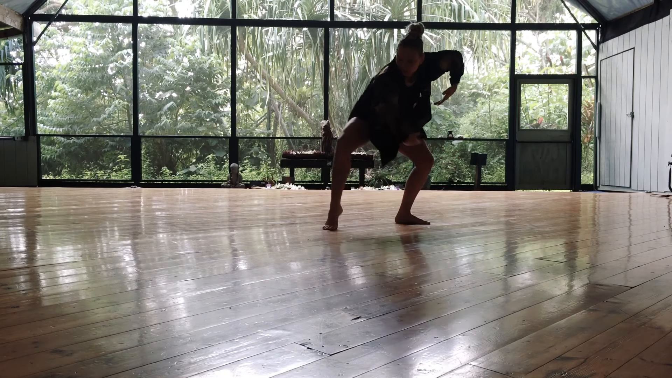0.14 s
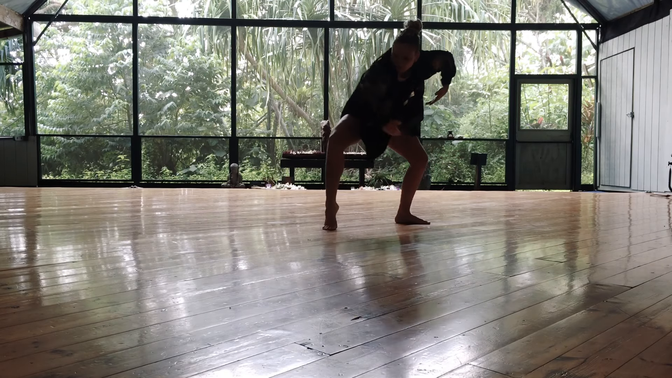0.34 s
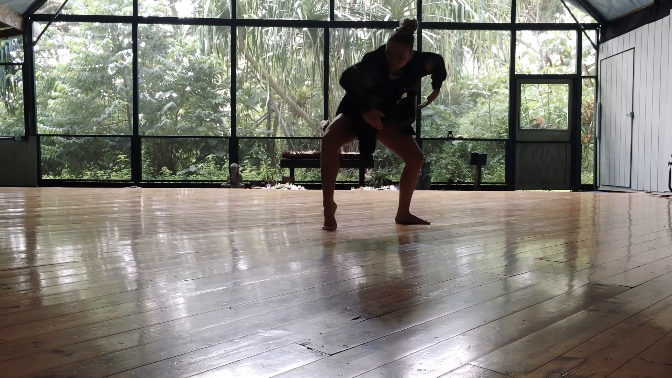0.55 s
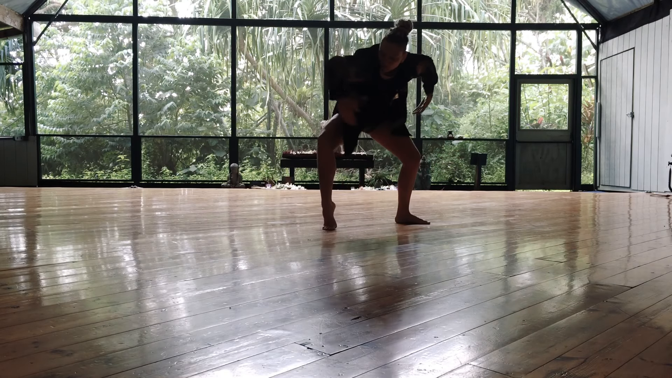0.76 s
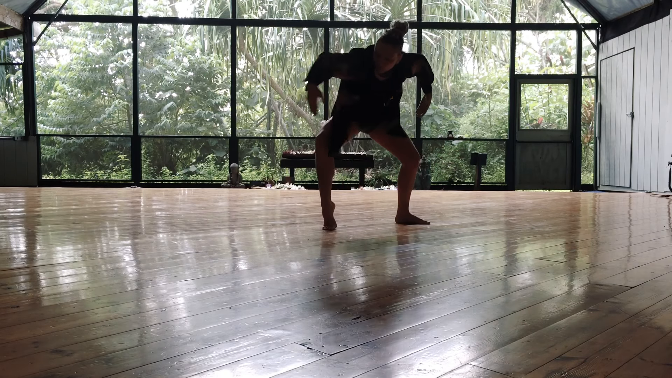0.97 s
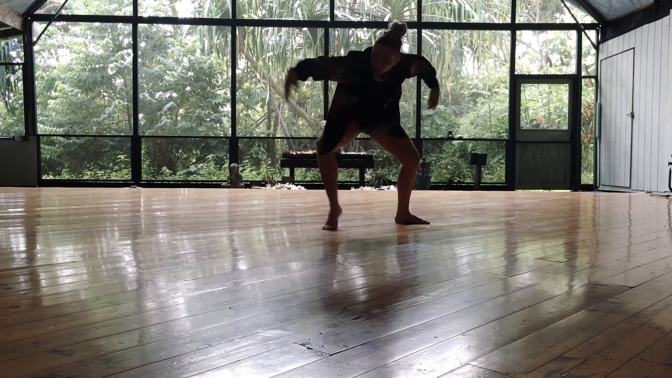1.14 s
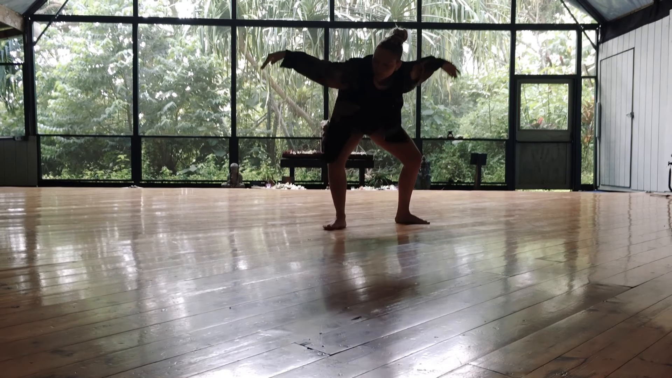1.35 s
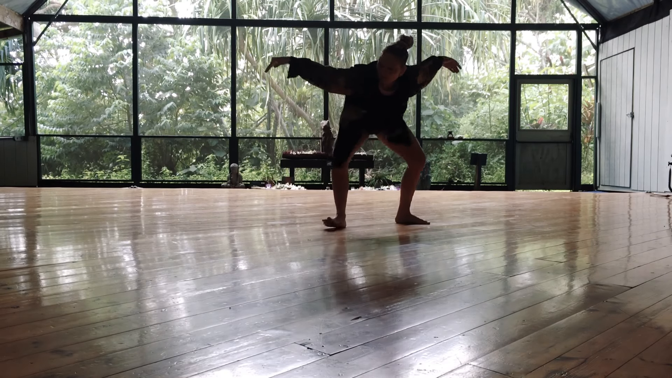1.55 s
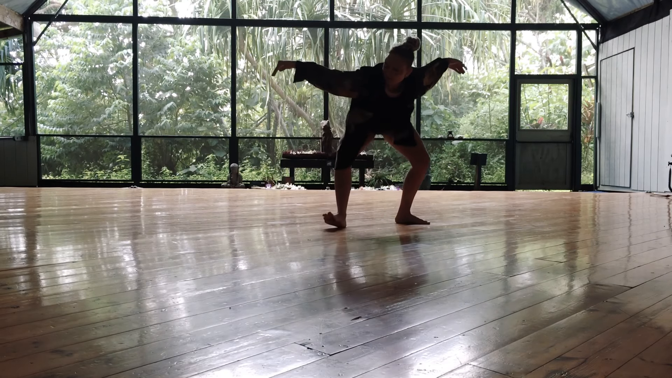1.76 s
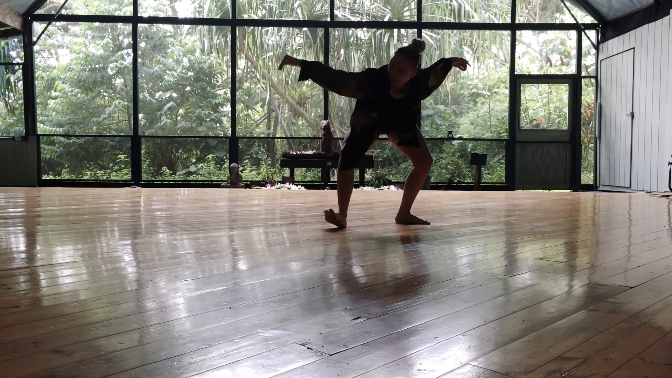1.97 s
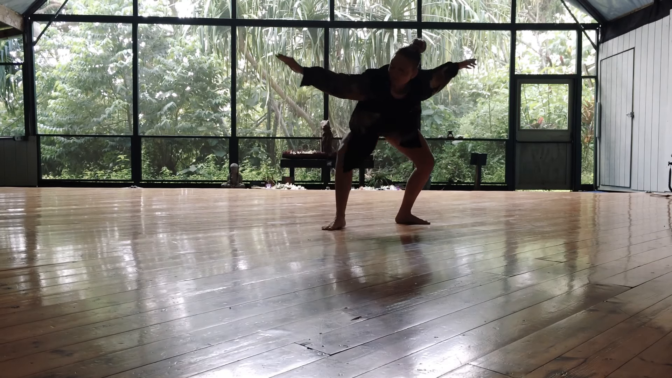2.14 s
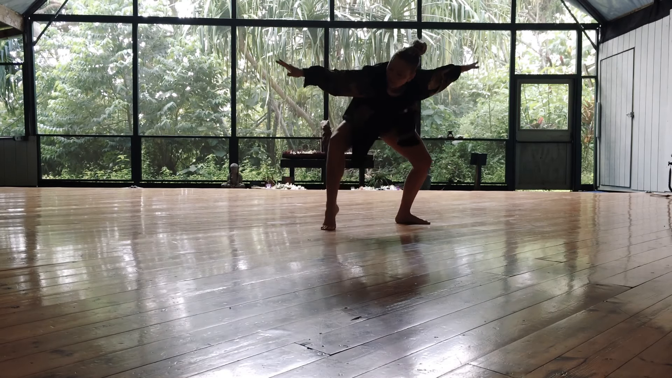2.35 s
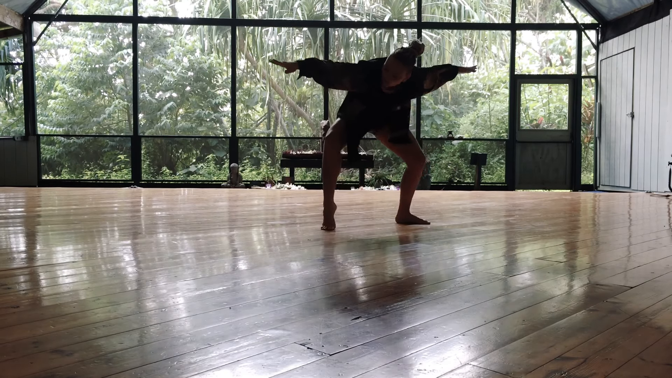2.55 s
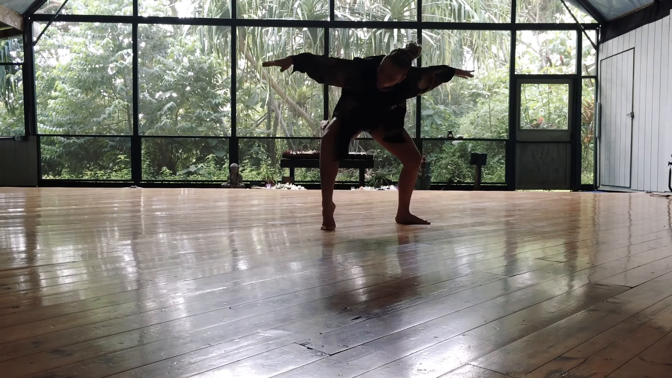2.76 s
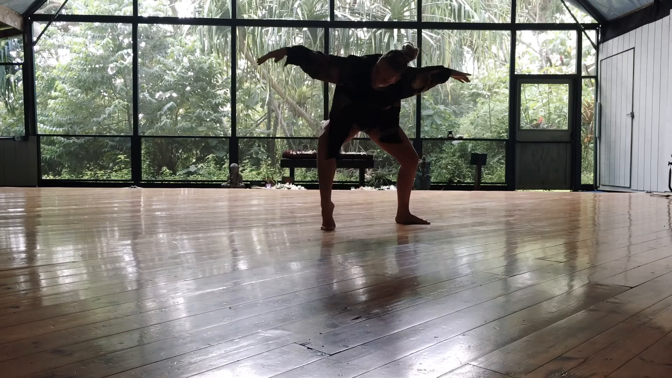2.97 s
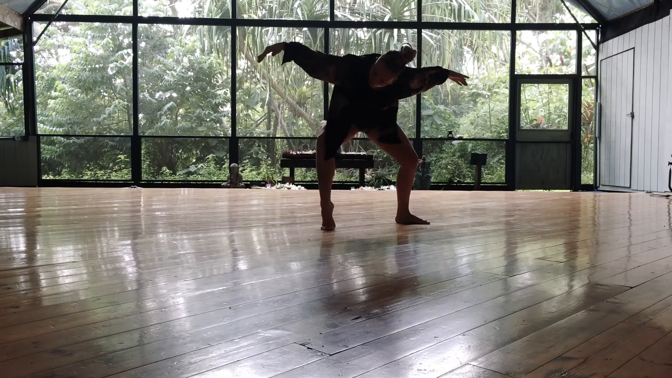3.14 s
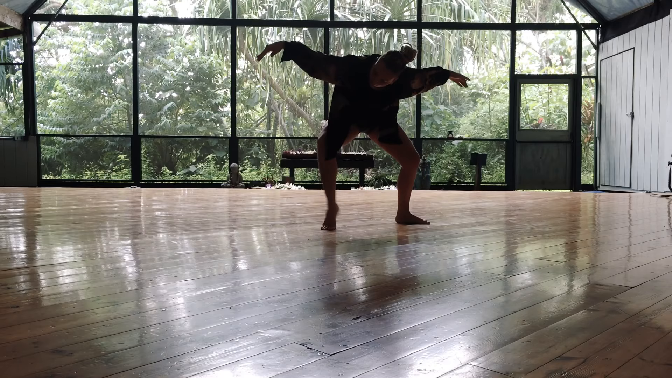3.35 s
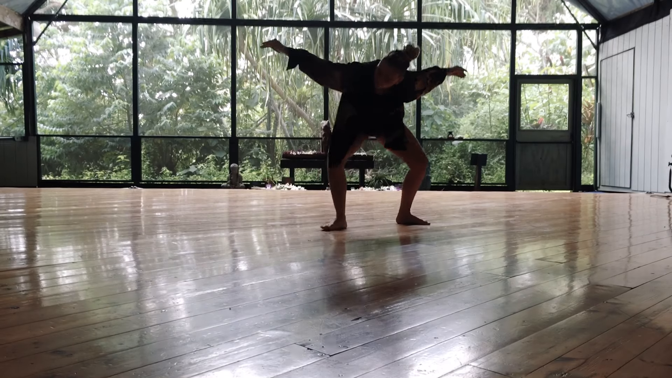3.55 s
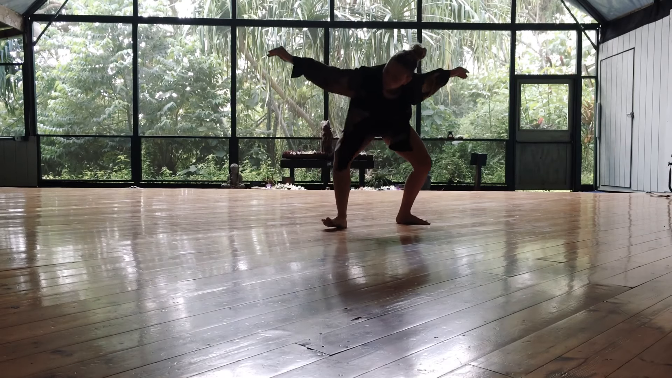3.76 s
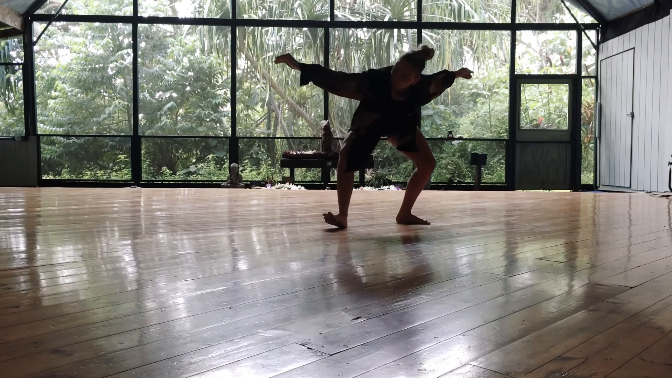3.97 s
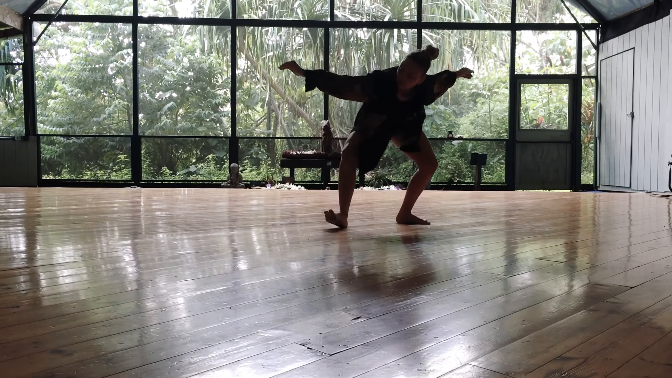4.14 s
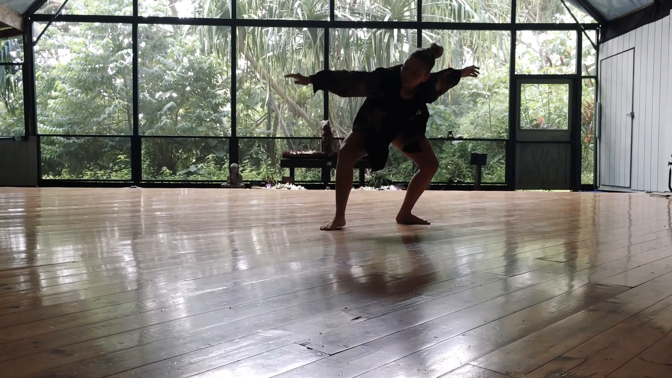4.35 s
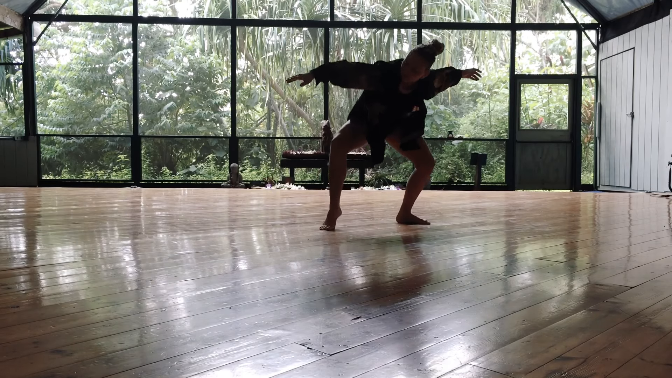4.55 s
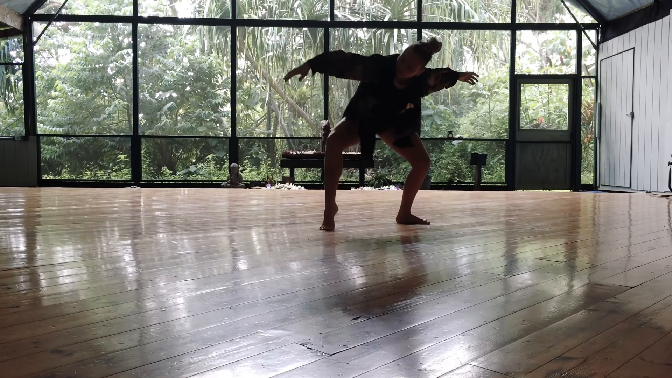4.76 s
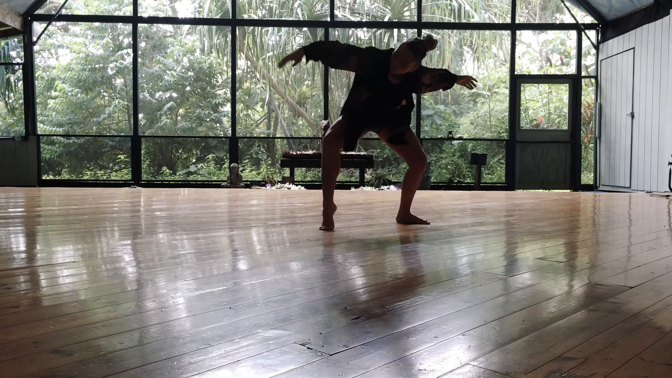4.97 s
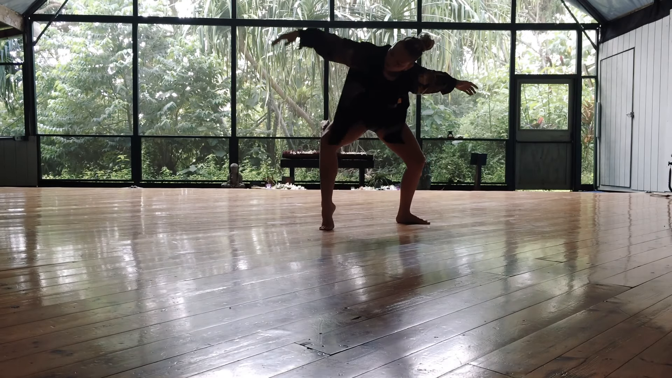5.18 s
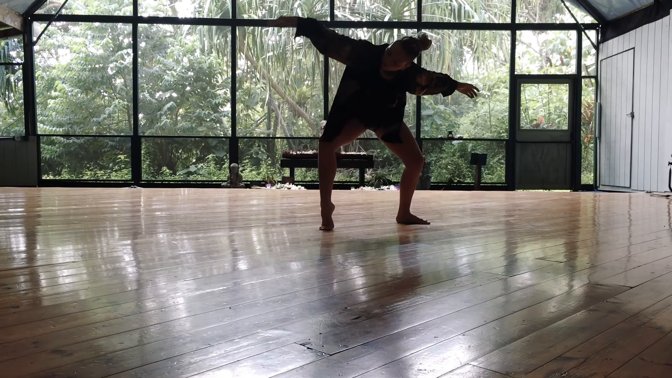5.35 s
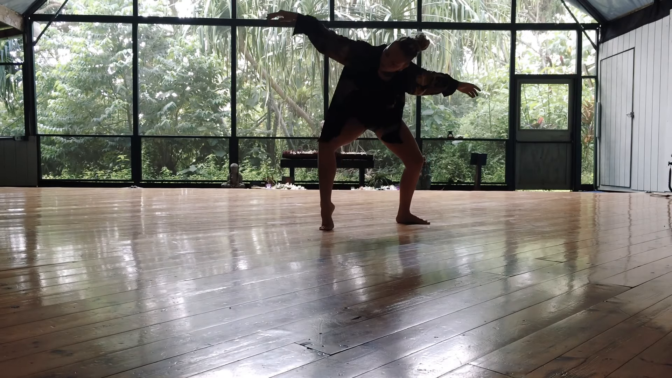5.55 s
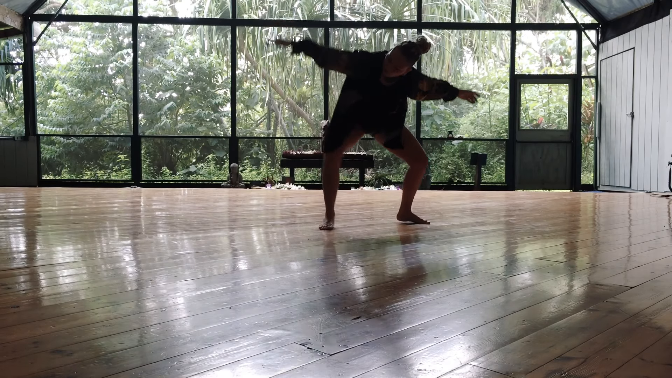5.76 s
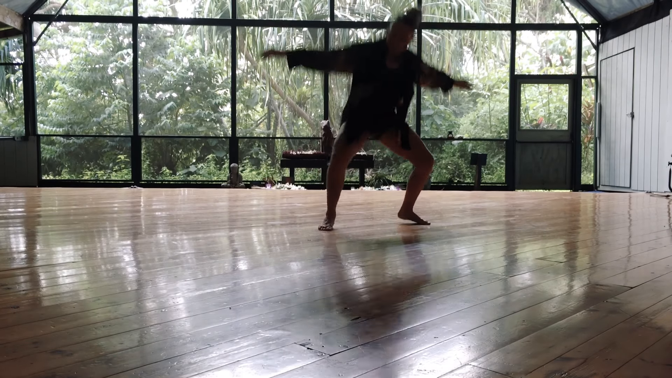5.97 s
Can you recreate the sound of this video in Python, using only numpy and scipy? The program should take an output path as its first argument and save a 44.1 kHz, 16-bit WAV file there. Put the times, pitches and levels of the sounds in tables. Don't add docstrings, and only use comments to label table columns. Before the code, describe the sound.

A quiet, large wooden-floored pavilion with faint low rumble and slight microphone hiss. Almost at once, at 0.04 s, the ball of a bare foot slaps the varnish with a bright crack, its echoes scattering off roof and walls. Thin, rapid insect trills near 6 kHz emerge very faintly, pausing and returning. After a barely audible toe touch at 1.1 s, a heel stamps firmly at 1.3 s, a deep thud with small rebounds as the boards ring briefly. A duller slap follows at 2.2 s, with a faint toe at 2.45 s. At 3.5 s comes the hardest stamp, a heavy boom with skin smack, quick rebound and a tail fading within about a second. A lighter, higher slap clicks at 4.4 s. A faint toe at 5.1 s, brief skin brushes around 5.85 s, then a softer stamp at 5.9 s, its echo cut short by the ending near 6 s.

```python
import sys
import numpy as np
from scipy import signal
from scipy.fft import rfft, irfft
from scipy.io import wavfile
from scipy.ndimage import uniform_filter1d

SR = 44100
rng = np.random.default_rng(int(sys.argv[2]) if len(sys.argv) > 2 else 0)


def master(y):
    cut = np.clip(np.atleast_2d(y).T, -1, 1)
    pcm = np.round(cut * 32767)
    wavfile.write(sys.argv[1], SR, pcm.astype(np.int16))


def elevation(decibels):
    levels = np.asarray(decibels, float)
    return 10 ** (levels / 20)


N = 265041


def at_hz(points, hz, column=1):
    table = np.array(points)
    return np.interp(np.log(hz), np.log(table[:, 0]), table[:, column])


def rms_one(x):
    return x / np.sqrt(np.mean(x ** 2) + 1e-20)


def drift(rate_hz):
    r = np.exp(-80 * np.pi * rate_hz / SR)
    noise = rng.standard_normal(N // 40 + 2002)
    slow = signal.lfilter([1], [1, -2 * r, r * r], noise)[2000:]
    return np.interp(np.arange(N) / 40, np.arange(len(slow)), rms_one(slow))


def resonate(x, hz, width_hz):
    r = np.exp(-np.pi * width_hz / SR)
    feedback = [1, -2 * r * np.cos(2 * np.pi * hz / SR), r * r]
    return signal.lfilter([(1 - r * r) / 2, 0, (r * r - 1) / 2], feedback, x)


def bands(size):
    edges = 22 * 2 ** np.arange(0, 9.6, .5)
    white = rng.standard_normal((2, size + 8000))
    for k, (low, high) in enumerate(zip(edges, edges[1:])):
        band_pass = signal.butter(2, [low, high], "band", fs=SR, output="sos")
        yield np.sqrt(low * high), signal.sosfilt(band_pass, white[k % 2])[8000:]


def add(out, piece, s):
    first = round(s * SR) - len(piece) // 2
    out[max(first, 0):first + len(piece)] += piece[max(-first, 0):len(out) - first]


def bell(ms, size=4096):
    u = (np.arange(size) - size // 2) / (SR * max(ms, .03) / 1000)
    return u, np.exp(-u ** 2 / 2)


def bursts(widths_ms):
    shape = []
    for ms in widths_ms:
        u = np.sign(ms) * bell(abs(ms))[0]
        steep = bell(min(abs(ms) / 5, .8))[1]
        shape.append(np.where(u < 0, steep, np.exp(-np.abs(u))))
    shape = np.array(shape)
    burst = rng.standard_normal(shape.shape) * shape
    for _ in range(6):
        spectrum = rfft(burst, axis=1)
        burst = irfft(spectrum / (np.abs(spectrum) + 1e-12), axis=1)
        level = np.sqrt(np.abs(uniform_filter1d(burst ** 2, size=15, axis=1)) + 1e-16)
        burst = burst / level * shape
    burst = burst * np.sign(np.sum(burst ** 3, axis=1, keepdims=True))
    return burst / np.sqrt(np.sum(burst ** 2, axis=1, keepdims=True))


# pitch_hz, level_db (per Hz)
RUMBLE_SPECTRUM = [(22, -25), (53, -0.5), (107, 2.5), (204, -5.5), (305, -14.5), (1420, -25.5),
                   (5200, -59.5), (11400, -110)]
# pitch_hz, level_db (per Hz)
HISS_SPECTRUM = [(300, -0.5), (5000, 9.5), (9000, 3.5), (15000, 0.5)]
# time_s, level_db
RUMBLE_FADER = [(0, -46.5), (1, -51), (5, -51), (6.01, -49)]


def background():
    rumble, hiss, together = 0, 0, drift(1.0)
    for hz, band in bands(N):
        patches_db = 1.4 * (.5 * together + drift(9.3))
        rumble = rumble + band * elevation(at_hz(RUMBLE_SPECTRUM, hz) + patches_db)
        hiss = hiss + band * elevation(at_hz(HISS_SPECTRUM, hz))
    time_s, level_db = np.transpose(RUMBLE_FADER)
    fader_db = np.interp(np.arange(N) / SR, time_s, level_db)
    return elevation(fader_db) * rms_one(rumble) + elevation(-74.5) * rms_one(hiss)


# start_s, tick_db, trapped_air_hz, crack_db, dent_db
TAPS = [
    (0.0381, -23.5, 2410, 6, -29),
    (2.2026, -22, 2100, -7.5, -28.5),
    (4.3754, -25, 3700, 0, -27.5),
]
# delay_ms, level_db, spread_ms, pitch_share, trapped_air_db
TAP_SKIN = [(0, 0, .05, 1.0, -1), (2.9, -12, .2, .53, 2)]
# start_s, dent_db, contact_ms, skin_lead_ms, skin_db
STAMPS = [
    (1.3041, -13.5, 2.3, 8, -34),
    (3.5212, -3.6, 1.8, 6.2, -27),
    (5.8957, -16, 2.5, 8.5, -32.5),
]
# time_share, level_db, spread_ms (minus: swells in), trapped_air_hz, crack_db
STAMP_SKIN = [(0, 6, -0.4, 1370, -10), (.7, -1.5, -4.5, 1540, -21.5), (1.002, 0.5, 6, 1410, -33),
              (1.098, -9, 19.5, 2240, -15), (4, -17, 26, 2000, -4)]
# start_s, level_db, spread_ms, trapped_air_hz, crack_db
TOUCHES = [
    (1.0985, -66, 2, 1190, -10),
    (2.4576, -60, 2.5, 1600, -17),
    (5.081, -64, 5, 1210, -16),
    (3.5268, -23, 3, 1300, -40),
    (5.8325, -39, 1.8, 1080, -30),
    (5.855, -49, 4, 2500, -12),
    (5.836, -47, 7, 1500, -16),
]


def contacts():
    rows = []
    for s, db, hz, crack_db, _ in TAPS:
        rows.append((s, -38.5, -1.27, 2000, 2.5, -3.5))
        for k, (lag_ms, part_db, ms, share, air_db) in enumerate(TAP_SKIN):
            after_crack_db = crack_db - 3 * k
            rows.append((s + lag_ms / 1000, db + part_db, ms, share * hz, air_db, after_crack_db))
    for s, _, _, lead_ms, db in STAMPS:
        for share, part_db, ms, hz, crack_db in STAMP_SKIN:
            rows.append((s - (1 - share) * lead_ms / 1000, db + part_db, ms, hz, -29, crack_db))
    for s, db, ms, hz, crack_db in TOUCHES:
        rows.append((s, db, ms, hz, -5, crack_db))
    return rows


def slaps():
    spots = 3
    out = np.zeros((spots, N))
    dull = signal.butter(1, [220, 900], "band", fs=SR, output="sos")
    airy = signal.butter(1, [1900, 10000], "band", fs=SR, output="sos")
    soft = signal.butter(1, 2500, fs=SR, output="sos")
    skin = contacts()
    for k, burst in enumerate(bursts(np.array(skin)[:, 2])):
        s, db, ms, air_hz, air_db, crack_db = skin[k]
        body = rms_one(signal.sosfilt(soft, signal.sosfilt(dull, burst)))
        ring = resonate(resonate(burst, air_hz, .2 * air_hz), air_hz, .5 * air_hz)
        trapped_air = rms_one(signal.sosfilt(soft, ring))
        crack = rms_one(signal.sosfilt(airy, burst))
        height = elevation(db) * np.sqrt(abs(ms) * SR / 1000 / len(burst))
        slap = height * (body - elevation(air_db) * trapped_air + elevation(crack_db) * crack)
        add(out[k % spots], slap, s)
    return out


# start_s, dent_db, contact_ms
REBOUNDS = [
    (1.318, -20, 2.6),
    (1.3345, -19.5, 3.4),
    (3.5322, -15, 1.6),
    (5.9256, -27, 1.8),
]


def dents():
    rows = [(s + 1.4 / 1000, db, 1.6, -5.5) for s, _, _, _, db in TAPS]
    for s, db, ms, _, _ in STAMPS:
        rows.append((s, db, ms, -11.5))
        rows.append((s - .4 * ms / 1000, db - 6, .42 * ms, -13.5))
    return rows + [(s, db, ms, -16) for s, db, ms in REBOUNDS]


# pitch_hz, level_db, t60_s
BOARD_MODES = [(40, 9, 0.65), (65, 18, 0.15), (106, -7, 0.12), (152, -20, 0.14), (199.6, 18.5, 0.062),
               (230, -46, 0.11), (363, -34, 0.11), (492, -28, .2)]


def thuds():
    dent, ringing = np.zeros(N), np.zeros(N)
    pushes = dents()
    strengths_db = rng.normal(0, 2, (len(pushes), len(BOARD_MODES)))
    for s, db, ms, _ in pushes:
        u, shape = bell(ms)
        add(dent, elevation(db) * (1 - u ** 2) * shape, s)
    for k, (hz, level_db, t60_s) in enumerate(BOARD_MODES):
        push = np.full(N, 1e-18)
        for (s, db, ms, ring_db), own_db in zip(pushes, strengths_db[:, k]):
            shape = bell(0.4 * ms)[1]
            add(push, elevation(db + ring_db + level_db + own_db - 20) * shape / shape.sum(), s)
        r = elevation(-60 / (t60_s * SR))
        w = 2 * np.pi * hz / SR
        mode = signal.lfilter([0, np.sin(w)], [1, -2 * r * np.cos(w), r * r], push)
        ringing += (-1) ** k * mode
    return dent + ringing


ECHO_DELAYS = [21.24, 24.51, 31.43, 52.2, 54.8]
# level_db, smear_ms
ECHO_HIGHS = [(-2, 2.46), (-6, 1.4), (-17, 4.9), (-6, 2.0), (-8, 2.9)]


def echoes():
    first = [(ms, db, smear_ms) for ms, (db, smear_ms) in zip(ECHO_DELAYS, ECHO_HIGHS)]
    ms, _, smear_ms = first[3]
    flutter = [(ms + 34.3 * (k + 1), -12 - 5 * k, smear_ms + 1.34 * k) for k in range(6)]
    return first + flutter


# delay_ms, share
MIRRORS = [(21, .35), (25.5, -.2), (30, .15), (53, -.12), (57.5, .13), (87, .06)]
# pitch_hz, level_db, t60_s
HALL_TAIL = [(60.5, -43, 0.1), (150, -80, 0.093), (330, -34, 0.36), (810, -31.5, 0.67), (2100, -33, 1),
             (4600, -36, 1), (7600, -38, 1), (14100, -41, 0.69)]


def pavilion(x):
    size = SR
    t = np.arange(size) / SR
    mirror, scattered = np.zeros(size), np.zeros((len(x), size))
    for ms, share in MIRRORS:
        mirror[round(ms * SR / 1000)] = share
    for ms, db, smear_ms in echoes():
        for path, burst in zip(scattered, bursts([smear_ms] * len(x))):
            add(path, elevation(db) * burst, ms / 1000)
    mirror = signal.sosfilt(signal.butter(2, 450, fs=SR, output="sos"), mirror)
    beams = signal.butter(1, [520, 7000], "band", fs=SR, output="sos")
    scattered = signal.sosfilt(beams, scattered)
    tail = 0
    for hz, band in bands(size * len(x)):
        dying_db = -60 * t / max(at_hz(HALL_TAIL, hz, column=2), .05)
        tail = tail + band.reshape(len(x), size) * elevation(at_hz(HALL_TAIL, hz) + dying_db)
    tail = tail * np.interp(t, [.02, .026, .051, .062], [0, .3, .35, .85])
    reflected = signal.fftconvolve(x, mirror + scattered + tail, axes=1)[:, :N]
    return np.sum(x + reflected, axis=0)


# start_s, end_s
HIGH_TRILLS = [(.36, 1.5), (1.82, 3.6), (4.0, 6.2)]
# start_s, end_s
LOW_TRILLS = [(1.05, 3.6), (4.4, 6.2)]


def insect(trills, hz, width_hz, per_s, pair_share, rough, db):
    t = np.arange(N) / SR
    phase = 2 * np.pi * np.cumsum(per_s * (1 + 0.0036 * drift(7.7))) / SR
    strokes = np.exp(np.cos(phase) - 1) + pair_share * np.exp(2 * (np.cos(2 * phase) - 1))
    scrape = rng.standard_normal(N) * (strokes + rough)
    song = rms_one(resonate(resonate(scrape, hz, width_hz), hz, 0.41 * width_hz))
    on, fade_s = 0, .18
    for start_s, end_s in trills:
        on = on + np.clip((t - start_s) / fade_s, 0, 1) * np.clip((end_s - t) / fade_s, 0, 1)
    on = .28 + (1 - .28) * on
    return elevation(db + drift(5)) * on * song


def scene():
    outside = background()
    feet = pavilion(np.vstack([slaps(), thuds()]))
    high = insect(HIGH_TRILLS, hz=6298, width_hz=460, per_s=63.6, pair_share=1.0, rough=1.0, db=-69.0)
    low = insect(LOW_TRILLS, hz=5953, width_hz=280, per_s=47.1, pair_share=0.28, rough=0.49, db=-75.5)
    return (outside + feet + high + low)[None, :]


def roll_off(x):
    return signal.sosfilt(signal.butter(12, 16270, fs=SR, output="sos"), x)


def record(dry):
    x = signal.sosfilt(signal.butter(2, 34, "high", fs=SR, output="sos"), dry)
    x = signal.sosfilt(signal.cheby2(14, 30, 15400, fs=SR, output="sos"), x)
    return roll_off(x)


dry = scene()
out = record(dry)
master(out)
```